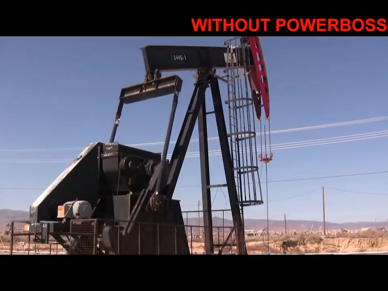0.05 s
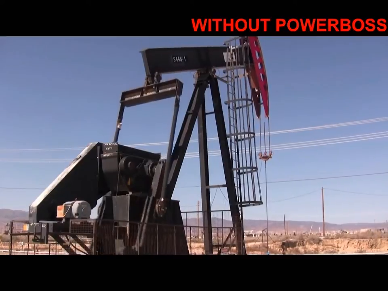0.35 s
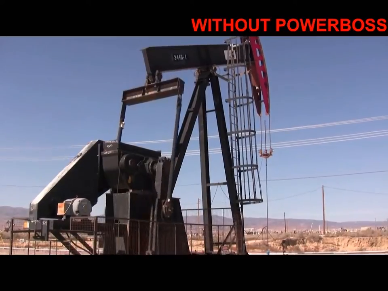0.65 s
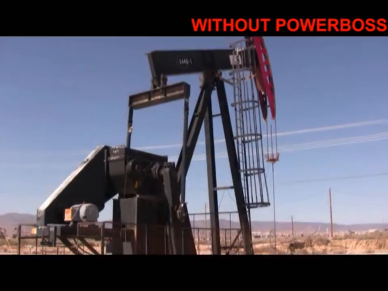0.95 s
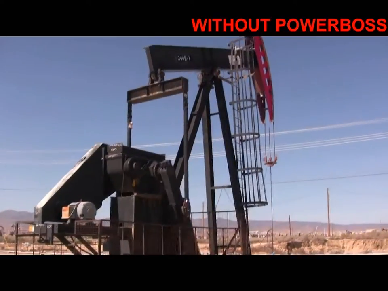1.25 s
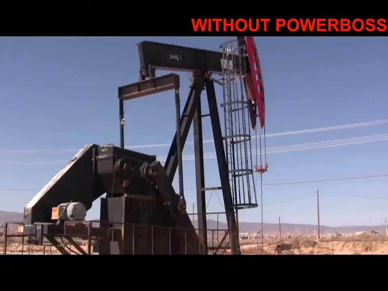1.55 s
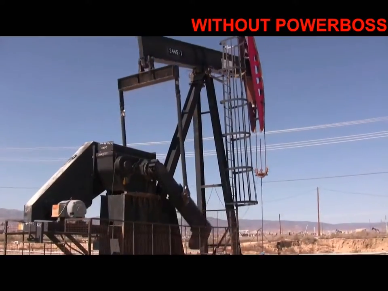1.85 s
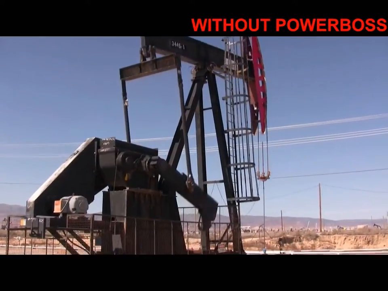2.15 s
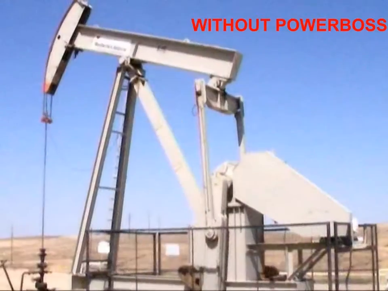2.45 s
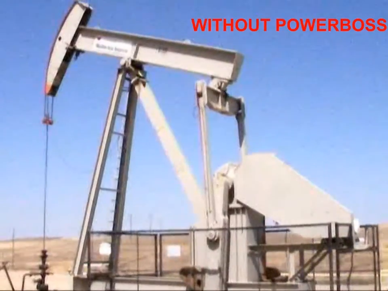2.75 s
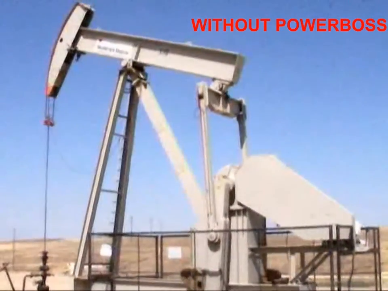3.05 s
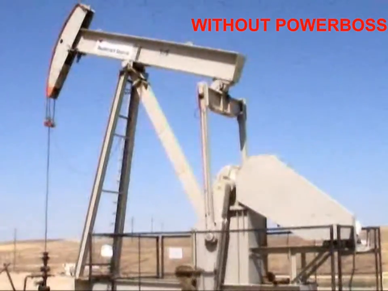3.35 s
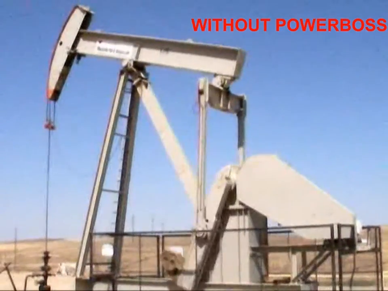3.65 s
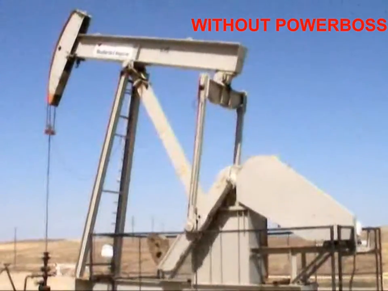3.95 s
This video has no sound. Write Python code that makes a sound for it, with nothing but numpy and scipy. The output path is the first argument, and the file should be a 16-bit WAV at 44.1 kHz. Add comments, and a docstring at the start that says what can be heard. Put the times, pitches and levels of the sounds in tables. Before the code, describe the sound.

An oil pumpjack hums in the wind, then a second starts up with squealing belts.

```python
"""Two oil pumpjacks in the open

Wind buffets a stereo microphone beside each in turn. The first runs steadily: mains hum, gear whine
and fan rush. After an abrupt cut the second stands almost still, its drive belts rubbing; its motor
kicks in, the belts squeal, break into a rasp, squeal again and grip."""
import sys
import numpy as np
from scipy import signal
from scipy.fft import rfft, irfft
from scipy.io import wavfile

SR = 44100
rng = np.random.default_rng(int(sys.argv[2]) if len(sys.argv) > 2 else 0)


def master_out(mix):
    """Clip the mix to full scale and print it as 16-bit PCM to the path in sys.argv[1]."""
    frames = np.transpose(np.atleast_2d(mix))
    ceiling = np.clip(frames, -1, 1)
    pcm = np.round(ceiling * 32767).astype(np.int16)
    wavfile.write(sys.argv[1], SR, pcm)


N = 176400
CUT_OUT_S, CUT_IN_S, MOTOR_START_S = 2.268, 2.292, 3.047

# stereo image at the first and the second pumpjack: f/Hz, side minus mid/dB, left minus right/dB
FIRST_MICS = [(30, -3, 2), (100, -22, 0.6), (400, -20, 0.5), (1400, -15, .2), (2600, -15.5, -.3),
              (6600, -6, -2), (9050, -1, 6), (12000, -6, -0.5)]
SECOND_MICS = [(40, -11, 0), (170, -21, -0.3), (500, -28.5, -1.5), (1200, -22.5, 1), (1850, -9.5, -3),
               (2400, 3, 3), (3180, -3.5, -4), (3720, -4, 0), (4400, -1.5, -5), (6300, 1, 2),
               (10000, -16, 0)]
# resonances of the belt guard: f/Hz, width/Hz, level/dB
GUARD_MODES = [(825, 37, 1), (1033, 33, -9.5), (1347, 59, -5.5), (1686, 38, -4), (1865, 28, -3),
               (2070, 48, -5), (2210, 53, -11.5), (4360, 95, -9)]


def amp(db):
    """Decibels to gain."""
    return 10 ** (np.asarray(db) / 20)


def unit(x):
    """Scales to rms 1."""
    return x / np.sqrt(np.mean(x ** 2) + 1e-20)


def clock():
    """Time of each sample in seconds."""
    return np.arange(N) / SR


def curve(rows, column=1):
    """One column of a table, joined by straight lines in time."""
    rows = np.array(rows)
    return np.interp(clock(), rows[:, 0], rows[:, column])


def across(rows, column=1):
    """One column of a table, joined by straight lines over log frequency."""
    rows = np.array(rows)
    return np.interp(np.log(np.fft.rfftfreq(N, 1 / SR) + 1), np.log(rows[:, 0] + 1), rows[:, column])


def burst(rows, column=1):
    """Gain from a level column, silent outside the table's span."""
    return amp(curve(rows, column)) * (clock() > rows[0][0]) * (clock() < rows[-1][0])


def wander(rate_hz):
    """Smooth random motion up to a rate, rms 1."""
    hz = np.fft.rfftfreq(N, 1 / SR)
    return unit(irfft(rfft(rng.standard_normal(N)) * (hz > 0) / (1 + (hz / rate_hz) ** 4), N))


def noise(colour, mics):
    """Stereo noise of a given spectral shape, rms 1, as wide as the microphone hears it."""
    mid, side = rfft(rng.standard_normal((2, N))) * amp(across(colour))
    side = side * amp(across(mics))
    return unit(irfft(np.array([mid + side, mid - side]), N))


def ring(modes):
    """Friction ringing a metal part in its narrow resonances, rms 1."""
    hz = np.fft.rfftfreq(N, 1 / SR)
    body = sum(amp(db) / (1 + 1j * (hz - f) / width) ** 2 for f, width, db in modes)
    return unit(irfft(rfft(rng.standard_normal(N)) * body, N))


def balance(x, mics):
    """Leans each frequency to the left or the right."""
    return irfft(rfft(x) * amp(np.outer([.5, -.5], across(mics, column=2))), N)


def low_pass(x, edge_hz):
    """Steep band limit."""
    taps = signal.firwin(401, edge_hz, window=("kaiser", 9), fs=SR)
    return signal.oaconvolve(x, taps[None], "same")


def motor_hum(swell_period_s=1.7, flutter_db=1.5):
    """Mains hum and gear whine, each tone wavering and swelling at its own place in the stroke."""
    # motor and gear tones: f/Hz, level/dB, pitch wander/Hz, loudest at t/s, swell/dB
    tones = [(119.9, -33.5, 0.28, .2, 2.5), (362.1, -33, .35, 1.3, 2.1), (708, -60, 3.26, 1.93, 16),
             (802, -62, 1.6, 2.4, 1), (1051, -50, 1.37, 0.82, 7), (1350, -50, 8.7, 1.54, 4.5),
             (1466, -48, 6.7, 1.8, 6.5), (1490, -46, 9.7, 1.15, 1), (1608, -54.5, 2.3, .7, 0),
             (1726, -46.5, 4.1, 1.24, 3.5)]
    out = np.zeros(N)
    for hz, db, drift, loudest, swell in tones:
        turns = np.cumsum(hz + drift * wander(20.1)) / SR
        load = np.cos(2 * np.pi * (clock() - loudest) / swell_period_s)
        level = db + swell * load + flutter_db * wander(9)
        out += amp(level) * unit(np.sin(2 * np.pi * turns))
    return out


def fan_rush():
    """The fan moves air in a broad, nearly even rush."""
    colour = [(240, -45), (400, -2), (698, -0.5), (853, -3.5), (1010, -5.5), (1250, -7), (1510, -3),
              (1600, -11.5), (1770, -8), (1920, -9.5), (3710, -18.5), (5380, -21.5), (12200, -40),
              (15800, -64), (22000, -120)]  # fan spectrum: f/Hz, level/dB
    return noise(colour, FIRST_MICS) * amp(-35 + 0.56 * wander(25))


def first_wind():
    """Lumpy gusts buffet the microphone at the first pumpjack."""
    colour = [(15, -55), (25, -38), (35, -23), (50, -6), (75, -7), (110, 1.5), (160, -1), (230, -4.5),
              (320, -9), (420, -21), (800, -28), (3000, -65)]  # rumble spectrum: f/Hz, level/dB
    gusts = [(0, -24.5), (.07, -24), (.1, -20), (.22, -21), (.35, -25.5), (.9, -26.5), (1.3, -26.5),
             (1.48, -31.5), (1.58, -24), (2.26, -25)]  # wind strength: t/s, level/dB
    return noise(colour, FIRST_MICS) * amp(curve(gusts) + 1.8 * wander(35))


def linkage_ticks(fade_s=.008):
    """Small bright ticks from the linkage."""
    colour = [(2000, -20), (6000, -3), (10000, 3), (15000, -3)]  # tick spectrum: f/Hz, level/dB
    ticks = [(.677, -48), (1.014, -47)]  # onsets: t/s, level/dB
    t = clock()
    envelope = sum(amp(db) * (t > start) * np.exp(-abs(t - start) / fade_s) for start, db in ticks)
    return noise(colour, FIRST_MICS) * envelope


def opening_click(fade_s=.001):
    """A dry snap that opens the second scene."""
    colour = [(200, 2), (1500, 1), (5000, -6), (8500, -9), (11000, -28)]  # snap spectrum: f/Hz, level/dB
    age = clock() - CUT_IN_S
    return noise(colour, FIRST_MICS) * amp(-29) * (age > 0) * np.exp(-abs(age) / fade_s)


def faint_hiss():
    """A faint, steady hiss behind the second pumpjack."""
    colour = [(210, -40), (350, -22), (474, -9.5), (524, -9.5), (1400, -6.5), (2160, -16.5), (4980, -28.5),
              (6640, -35.5), (7450, -77), (11000, -36), (14300, -78), (22000, -120)]  # spectrum of the faint hiss: f/Hz, level/dB; a band near 8 kHz is left almost empty
    return noise(colour, SECOND_MICS) * amp(-46)


def second_wind():
    """Lighter gusts buffet the microphone at the second pumpjack."""
    colour = [(15, -46), (30, -22), (45, -8), (70, 2.5), (100, -1.5), (170, 2), (240, -4), (290, -12),
              (380, -28.5), (1500, -84)]  # rumble spectrum: f/Hz, level/dB
    gusts = [(2.29, -35.5), (2.34, -30), (2.5, -33), (3.03, -32), (3.3, -36.5), (3.5, -29.5), (4, -32.5)]  # wind strength: t/s, level/dB
    return noise(colour, SECOND_MICS) * amp(curve(gusts) + 2 * wander(24))


def belt_rub():
    """The belts rub on the pulley and set it ringing."""
    colour = [(400, -31), (900, -19), (1150, 0.5), (1330, 2.5), (1550, -3.5), (1800, -11), (2080, -15),
              (2600, -14), (3600, -18.5), (4200, -16.5), (4800, -25), (5400, -29.5), (6800, -36),
              (8000, -56), (11000, -45)]  # spectrum of the rubbing noise: f/Hz, level/dB; a band near 8 kHz is left nearly empty
    rubs = [(2.3, -44.5), (2.38, -52.5), (2.42, -38.5), (2.49, -36.5), (2.57, -45.5), (2.68, -57),
            (2.73, -45), (2.8, -54), (2.91, -43), (3.0, -46), (3.52, -29.5), (3.62, -43.5), (4, -45.5)]  # rubbing strength: t/s, level/dB
    pulley_modes = [(1376, 31, -2), (2093, 36, -16.5), (3450, 34, -16.5), (3860, 29, -17),
                    (4660, 40, -20.5), (4840, 60, -19.5)]  # pulley resonances: f/Hz, width/Hz, level/dB
    rubbing = noise(colour, SECOND_MICS) + amp(-1.5) * ring(pulley_modes)
    return rubbing * amp(curve(rubs) + 0.73 * wander(70))


def bumps(half_width_s=.009):
    """Dull, low thuds lasting a few cycles."""
    thuds = [(2.303, 240, -26), (3.683, 185, -20)]  # thud peaks: t/s, f/Hz, level/dB
    t = clock()
    out = np.zeros(N)
    for centre, hz, db in thuds:
        envelope = amp(db) * np.exp(-((t - centre) / half_width_s) ** 2)
        out += envelope * np.sqrt(2) * np.sin(2 * np.pi * (hz * t + rng.random()))
    return out


def frame_shudder():
    """The frame shakes briefly as the motor kicks in."""
    colour = [(40, -8), (120, -3), (200, 3.5), (290, 1.5), (400, -19.5), (700, -14), (3000, -80)]  # frame spectrum: f/Hz, level/dB
    jolt = [(3.04, -45), (3.055, -23), (3.1, -19.5), (3.127, -20), (3.15, -23), (3.178, -21.5),
            (3.195, -49)]  # shaking strength: t/s, level/dB
    return noise(colour, SECOND_MICS) * burst(jolt)


def belt_rasp():
    """The slipping belts rasp and ring their guard."""
    # spectrum of the rasping noise: f/Hz, level/dB; a band near 8 kHz is left almost empty
    colour = [(300, -45), (550, -22), (820, 1), (1050, -1.5), (1400, -6.5), (1650, 2), (2200, -7),
              (2700, -6), (3200, -6), (4100, -9), (5000, -15), (6800, -16.5), (7800, -56), (10000, -20.5),
              (11000, -44)]
    rasps = [(3.045, -32), (3.065, -22), (3.11, -33), (3.135, -34), (3.18, -30.5), (3.24, -24.5),
             (3.275, -18.5), (3.305, -19), (3.335, -23), (3.365, -21), (3.41, -30), (3.47, -37),
             (3.52, -33), (3.6, -36.5), (3.75, -47)]  # rasp strength: t/s, level/dB
    rasping = noise(colour, SECOND_MICS) + amp(-4.5) * ring(GUARD_MODES)
    return rasping * burst(rasps) * amp(1.1 * wander(110))


def motor_start(rise_s=0.0032, clack_fade_s=0.022):
    """The second motor kicks in with a clack and runs on under load, the belt guard ringing."""
    # spectrum of the sharp burst: f/Hz, level/dB; a band near 8 kHz is left almost empty
    burst_colour = [(200, 0), (800, 3), (2000, -10), (3000, -14), (3900, 11), (5000, -2), (6500, -5),
                    (8000, -34), (11000, -8)]
    # spectrum of the running noise: f/Hz, level/dB; a band near 8 kHz is left almost empty
    running_colour = [(240, -41), (400, -11), (466, -26), (513, 0), (958, -7), (1320, -2.5), (3110, -11.5),
                      (4400, -11), (6960, -18.5), (7360, -27), (7890, -70), (9060, -21), (11000, -16),
                      (14300, -75), (22000, -120)]
    age = np.maximum(clock() - MOTOR_START_S, 0)
    onset = np.minimum(age / rise_s, 1)
    clack = noise(burst_colour, SECOND_MICS) * np.exp(-age / clack_fade_s) * amp(-19.5)
    running = noise(running_colour, SECOND_MICS) * amp(-39 + 2.0 * wander(46))
    guard = amp(-44.5) * ring(GUARD_MODES)
    return onset * (clack + running + guard)


def motor_drone():
    """The second motor drones low under load."""
    colour = [(40, -45), (100, -13), (165, -0.5), (215, -1), (275, -2), (320, -14), (390, -33), (1500, -86)]  # drone spectrum: f/Hz, level/dB
    surges = [(3.05, -36), (3.2, -39.5), (3.36, -36), (3.402, -23.5), (3.44, -34.5), (3.53, -24.5),
              (3.62, -28), (3.8, -27.5), (3.96, -27.5), (4.1, -29)]  # drone strength: t/s, level/dB
    return noise(colour, SECOND_MICS) * burst(surges)


def belt_squeal(pitch_jitter=0.021, flutter_db=2.86, overtone_jitter_rad=0.75, overtone_flutter_db=2.5):
    """Stick-slip of the belts: a jittery tone whose rough overtones differ from left to right."""
    squeal = [(3.091, 1640, -26, -10), (3.103, 1660, -12, -11), (3.114, 1620, -28, -4),
              (3.122, 1510, -22, 1.5), (3.133, 1590, -32, 1.5), (3.142, 1633, -13.5, -8),
              (3.151, 1501, -30, 3), (3.162, 1420, -13, -3), (3.173, 1391, -20, 2),
              (3.181, 1340, -14.5, -9), (3.189, 1291, -27.5, 6), (3.196, 1245, -20, 7.5),
              (3.228, 1250, -19, 8), (3.255, 1263, -31, 14.5), (3.275, 1250, -38.5, 24),
              (3.305, 1320, -28, 3), (3.375, 1220, -28.5, 13), (3.398, 1275, -17.5, -2.5),
              (3.436, 1299, -14, -5.5), (3.466, 1297, -22.5, 6.5), (3.495, 1353, -20.5, -11),
              (3.56, 1320, -34, -16)]  # course of the squeal: t/s, f/Hz, level/dB, overtone boost/dB
    overtones = [-9.5, -15.5, -25]  # harmonics 2 to 4 before the boost: level/dB
    turns = np.cumsum(curve(squeal) * (1 + pitch_jitter * wander(400))) / SR
    out = np.sin(2 * np.pi * turns) * np.ones((2, 1))
    for harmonic, db in enumerate(overtones, 2):
        for channel in out:
            level = db + curve(squeal, column=3) + overtone_flutter_db * wander(120)
            phase = 2 * np.pi * harmonic * turns + overtone_jitter_rad * wander(110)
            channel += amp(level) * np.sin(phase)
    return np.sqrt(2) * out * burst(squeal, column=2) * amp(flutter_db * wander(170))


def side_squeals(pitch_jitter=.022):
    """Other belts in the set slip in short, rough tones that swell and die."""
    chirps = [(3.268, 0.158, 823, -28), (3.28, 0.047, 2225, -20), (3.328, 0.061, 2025, -23),
              (3.433, 0.056, 2230, -24.5), (3.492, 0.04, 6400, -38)]  # slips: t/s, length/s, f/Hz, level/dB
    out = np.zeros(N)
    for start, length, hz, db in chirps:
        arch = np.sin(np.pi * np.clip((clock() - start) / length, 0, 1))
        turns = np.cumsum(hz * (1 + pitch_jitter * wander(250))) / SR
        out += amp(db) * arch * unit(np.sin(2 * np.pi * turns))
    return out


def scene(gap_db=-20.5):
    """The running pumpjack, a blink of near silence, then the starting one with duller treble."""
    running = balance(motor_hum() + fan_rush() + first_wind() + linkage_ticks(), FIRST_MICS)
    background = faint_hiss() + second_wind() + bumps()
    belts = belt_rub() + belt_rasp() + belt_squeal() + side_squeals()
    machine = frame_shudder() + motor_start() + motor_drone()
    starting = balance(background + belts + machine, SECOND_MICS)
    before_cut = clock() < CUT_OUT_S
    second_gain = np.where(clock() > CUT_IN_S, 1, amp(gap_db) * ~before_cut)
    return running * before_cut + low_pass(starting * second_gain + opening_click(), edge_hz=11200)


def record(dry):
    """The recorder's band limit."""
    return low_pass(dry, edge_hz=15750)


dry = scene()
out = record(dry)
master_out(out)
```